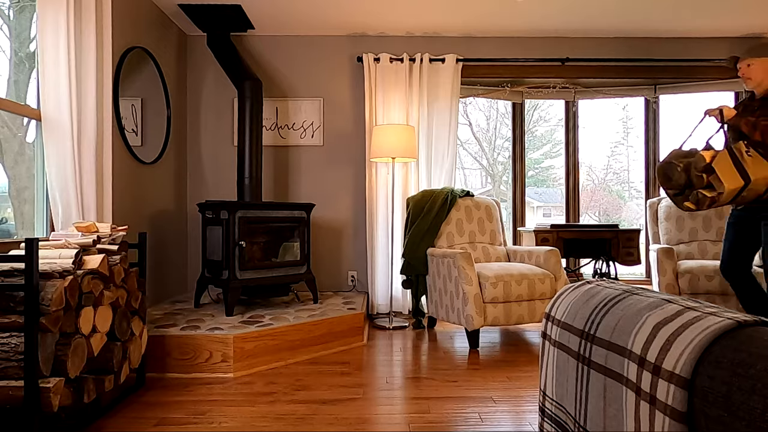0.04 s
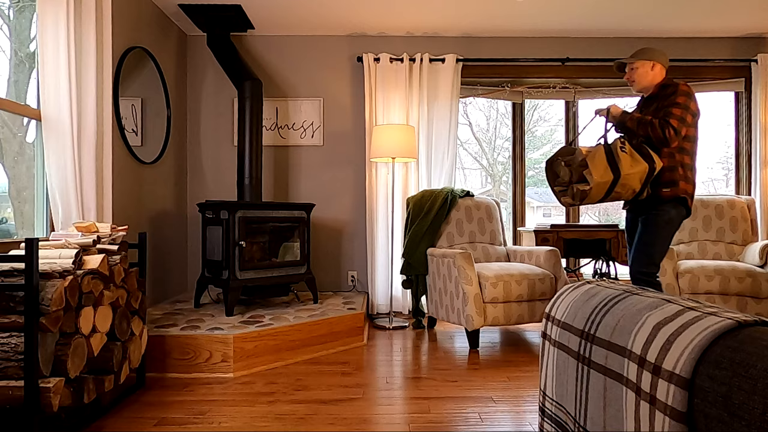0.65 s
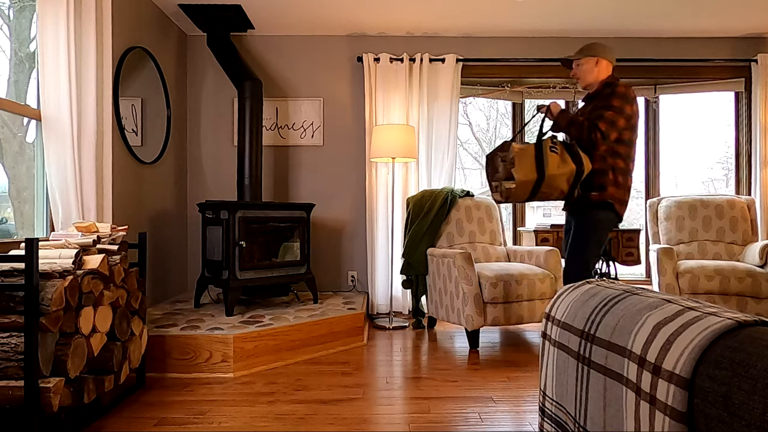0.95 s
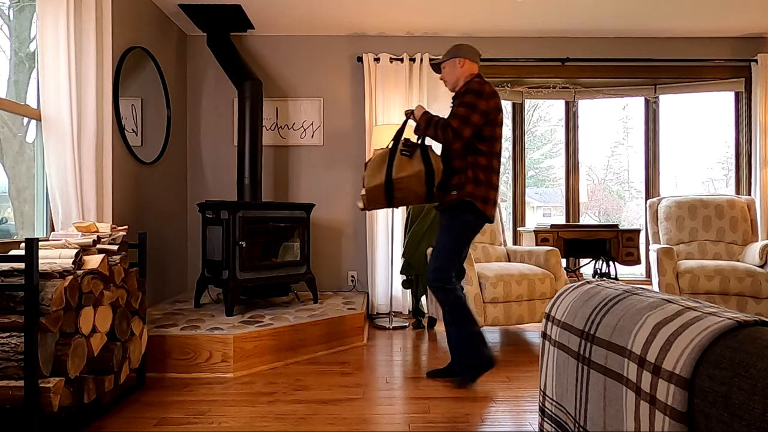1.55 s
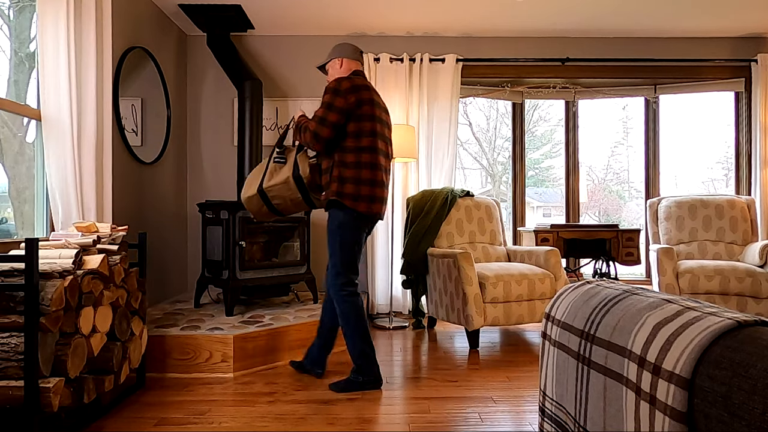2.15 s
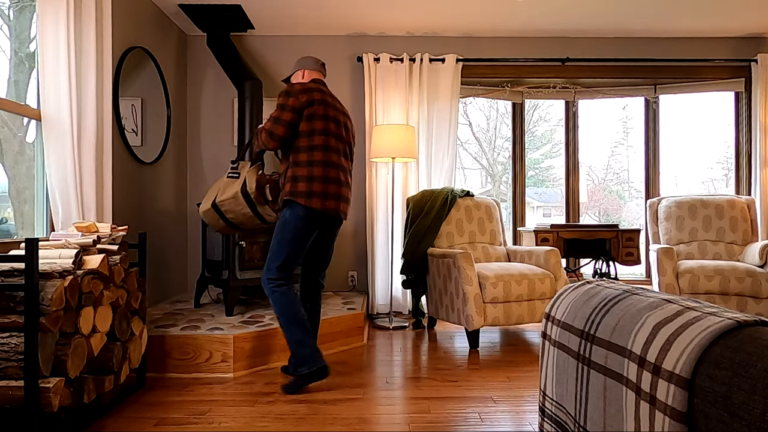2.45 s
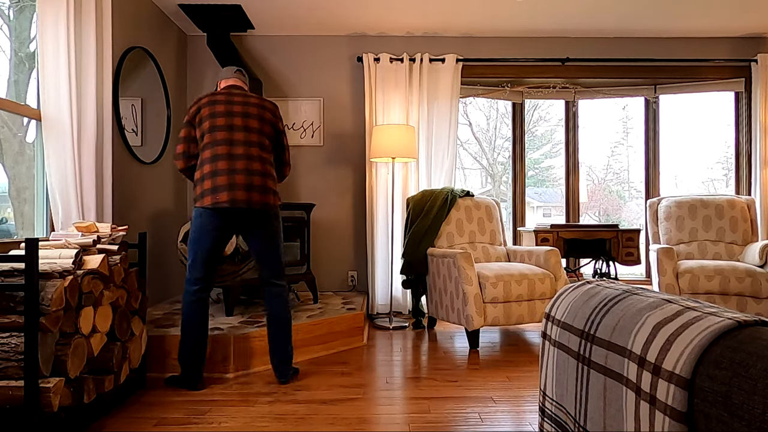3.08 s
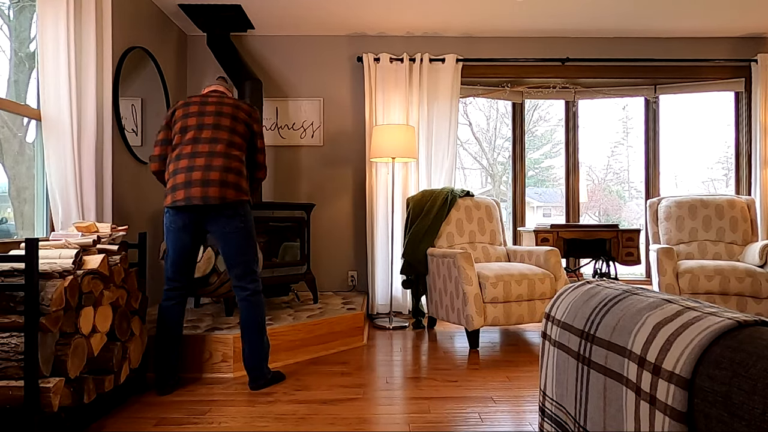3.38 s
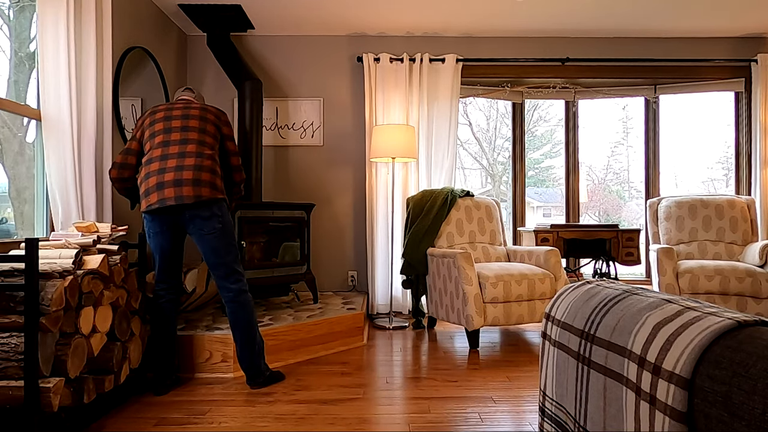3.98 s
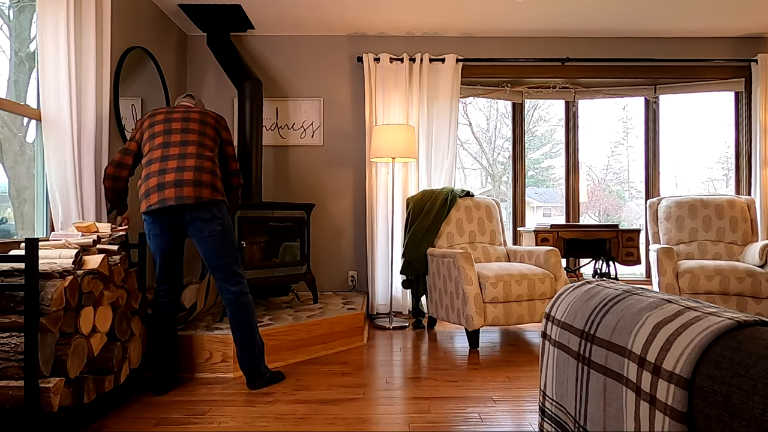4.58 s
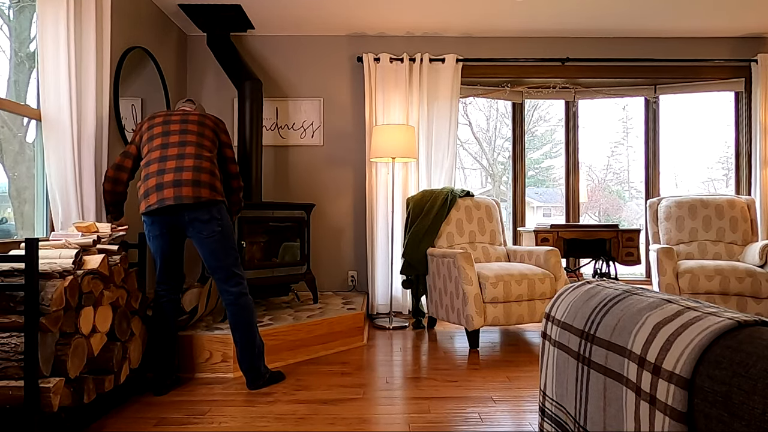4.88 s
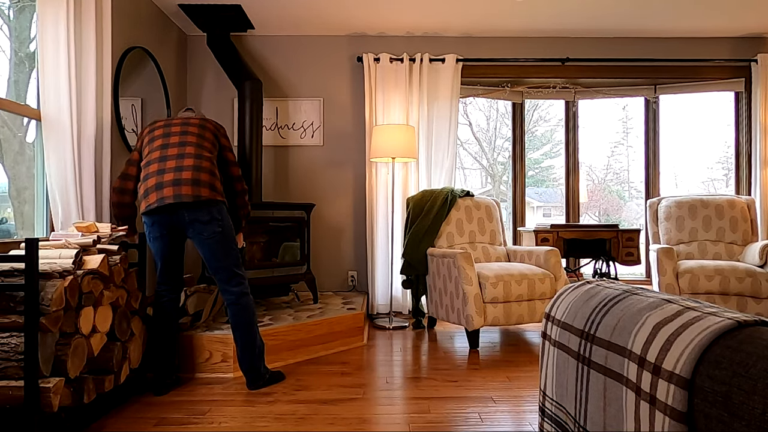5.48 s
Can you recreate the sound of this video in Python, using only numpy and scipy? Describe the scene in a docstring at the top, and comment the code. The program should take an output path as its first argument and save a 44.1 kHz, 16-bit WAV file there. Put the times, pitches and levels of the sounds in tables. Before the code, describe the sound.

Deep, dull footfalls cross the floorboards of a living room, slightly right of the microphone, with soft sock scuffs. The firewood being carried gives one quick, loud clatter. The steps lighten while canvas swishes and bark crackles, then the logs slide, knock and briefly squeak as they settle on a stone hearth, its hollow base thudding under them. A faint fan runs throughout.

```python
"""A living room with a wooden floor and a stone hearth. A man in socks carries a canvas bag of split
firewood across it and sets it down. His heels set the joists booming, and the load thuds on the hollow
platform under the stone. Logs knock, squeak and scrape, bark snaps, canvas rustles and socks scuff
the boards. A fan hums faintly behind it all."""
import sys
import numpy as np
from scipy import signal
from scipy.fft import rfft, irfft, next_fast_len
from scipy.io import wavfile
from scipy.ndimage import uniform_filter1d

SR = 44100
rng = np.random.default_rng(int(sys.argv[2]) if len(sys.argv) > 2 else 0)


def inscribe(sig):
    """Save sig as 16-bit PCM at rate SR to the path in sys.argv[1].

    A 1-D sig is mono; a 2-D sig holds one channel per row.
    Samples are clipped to [-1, 1] before scaling.
    """
    pcm = np.round(np.clip(np.atleast_2d(sig).T, -1, 1) * 32767)
    wavfile.write(sys.argv[1], SR, pcm.astype(np.int16))


N = 243873
TIME = np.arange(N) / SR

# footsteps: (time [s], heel level [dB], heel contact [s], bone tap level [dB], push-off level [dB])
FOOTSTEPS = [(-.017, -37.5, 0.027, -62, -35), (.509, -24.5, .022, -63, -37), (.965, -24, .03, -64, -25),
             (1.452, -24.5, 0.023, -45, -28), (1.897, -25, 0.02, -55, -27),
             (2.978, -32.5, 0.021, -54.5, -46), (3.279, -39.5, 0.06, -69, -44.5),
             (3.685, -50.5, 0.023, -61, -59), (4.996, -40.5, 0.033, -65, -45),
             (5.168, -33, 0.024, -60, -46), (5.442, -43.5, 0.019, -59.5, -56)]
# boom of joists and boards: (frequency [Hz], level [dB], t60 [s])
FLOOR_BOOM = [(22.68, -13, 0.89), (29.6, -12.5, 0.49), (44, 1, .33), (55.1, -1, 0.5), (88.8, -4, 0.45),
              (126.6, -9, 0.34), (150.7, -5.5, 0.24), (188.5, -9, 0.32), (261, -9.5, 0.18)]
# the load bumps down: (time [s], first end level [dB], other end level [dB], contact [s])
LANDINGS = [(4.331, -38.5, -36, 0.011), (4.425, -47, -52, 0.0027), (4.803, -37, -40.5, 0.012),
            (5.15, -39.5, -30.5, 0.0079), (5.246, -29, -33.5, .006), (5.308, -43.5, -52, 0.0026),
            (5.36, -31.5, -38, 0.0097)]
# boom of the hollow platform under the stone: (frequency [Hz], level [dB], t60 [s])
HEARTH_BOOM = [(28, -22, 0.75), (45.5, -5, 0.19), (68, -2.5, 0.25), (107, -1, 0.085), (136, -4, 0.096),
               (161.7, -2, 0.27), (228.7, 2, .16), (352, -5.5, 0.074)]
# log against log: (time [s], ring level [dB], hardness [dB])
LOG_HITS = [(2.013, -49.5, 3.5), (2.591, -30.5, 6), (2.604, -30.5, 3), (2.617, -30, 8.5),
            (2.621, -30.5, 8.5), (2.630, -31, -0.5), (3.008, -56, -10.5), (3.933, -54.5, 14),
            (4.318, -48, 3), (4.573, -53.5, 10.5), (4.746, -44.5, 4), (4.789, -44.5, -13.5),
            (4.817, -48, 0), (4.845, -46.5, -12.5), (5.18, -43, -1), (5.249, -33, 0), (5.292, -40.5, 0),
            (5.366, -43, 4.5), (5.373, -42.5, 5.5), (5.398, -54, -2)]
# ring heard on each knock, wood modes plus the microphone's resonance near 1.2-1.3 kHz:
# (frequency [Hz], level [dB], t60 [s])
KNOCK_RING = [(354, -6, 0.18), (443, 1.5, 0.099), (517, -5, 0.18), (620, -6.5, 0.075), (1195, 2.5, 0.31),
              (1211, -3.5, 0.2), (1233, -1.5, 0.24), (1288, 3.5, 0.12), (1308, 3, 0.2), (1382, -1, 0.16),
              (1574, 2, 0.085), (1635, -10, 0.066), (2190, 6.5, .07), (2440, -5, 0.06), (2725, -5, 0.12),
              (2950, 0, 0.11), (3280, -25, 0.11), (3280, -3.5, 0.071), (3550, -7, 0.14), (4620, -10, 0.094),
              (4770, -6, 0.06), (5050, -9, 0.044)]
# crunch of wood on wood: (frequency [Hz], level [dB])
CRUNCH_EQ = [(150, -16.5), (330, -16), (440, -11.5), (620, -9.5), (850, -29), (1050, -5), (1230, 4),
             (1430, -6.5), (1620, 0), (1920, -9.5), (3100, -4), (4000, -10.5), (5000, -12), (7000, -20),
             (11000, -36.5), (13500, -50), (15000, -59)]
# dry wood squeaks: (time [s], level [dB], pitch [Hz], length [s])
WOOD_SQUEAKS = [(2.01, -46.5, 3076, 0.0145), (2.014, -47, 1317, 0.043), (3.936, -54, 2760, 0.036),
                (5.098, -47, 2410, 0.026), (5.13, -46.5, 2944, 0.029), (5.24, -27.5, 1638, 0.021),
                (5.289, -40, 3700, 0.011)]
# bark and splinters snap, cloth crackles: (time [s], level [dB], centre [Hz])
BARK_SNAPS = [(.227, -51.5, 4030), (0.987, -56.5, 4370), (1.008, -59, 4770), (1.468, -52.5, 2400),
              (1.69, -54, 2600), (1.923, -55.5, 2470), (1.966, -50, 2780), (2.017, -51.5, 5850),
              (3.474, -42.5, 3100), (3.509, -48, 9000), (3.937, -46, 5100), (4.292, -43.5, 4650),
              (4.296, -37, 5070), (4.35, -52, 11000), (4.575, -52.5, 6530), (4.716, -46, 8000),
              (4.761, -43.5, 5500), (4.857, -43.5, 3580)]
# logs slide on the stone: (peak time [s], level [dB], swell [s])
LOG_SLIDES = [(4.375, -47, 0.086), (4.59, -63, 0.05), (4.752, -40.5, 0.055), (4.81, -41.5, 0.056),
              (4.94, -51.5, 0.63), (5.19, -44.5, .16), (5.25, -40.5, 0.055), (5.38, -37.5, 0.031)]
# wood dragged on stone: (frequency [Hz], level [dB])
SCRAPE_EQ = [(100, 3.5), (200, -3.5), (550, -1), (850, -6.5), (1250, 3.5), (1900, -6.5), (2500, -7),
             (4600, -23), (7000, -36), (11000, -34), (15000, -53)]
# bag and clothes swish: (peak time [s], level [dB], swell [s])
SWISHES = [(.05, -55.5, .2), (.14, -59, 0.34), (.64, -64.5, 0.19), (1.02, -63.5, 0.16), (1.47, -68.5, 0.22),
           (1.57, -62.5, 0.13), (1.71, -66.5, 0.097), (1.95, -66, 0.36), (2.57, -58.5, 0.21),
           (3.12, -61.5, 0.17), (3.37, -58.5, 0.4), (3.48, -52, 0.13), (3.6, -62.5, .05), (3.74, -63, .07),
           (3.85, -60.5, .14), (4.35, -47.5, 0.056), (4.775, -46.5, 0.096), (4.87, -67, .03),
           (5.12, -57, 0.17)]
# steady rub as the bag is swung round, lowered and opened: (time [s], level [dB])
BAG_RUB = [(1.3, -80.5), (1.8, -77.5), (2.3, -68.5), (2.9, -77), (3.55, -61.5), (3.7, -96), (4.25, -100),
           (4.65, -63), (4.95, -60.5), (5.53, -69)]
# rubbing cloth: (frequency [Hz], level [dB])
CANVAS_EQ = [(400, -10.5), (900, -10.5), (1300, -2), (1850, -4), (3200, -6.5), (4700, -7.5), (7700, -15.5),
             (12000, -31), (15000, -41)]
# socks scuff the boards: (peak time [s], level [dB], swell [s])
SOCK_SCUFFS = [(.06, -52.5, 0.072), (.16, -63, .05), (.65, -56.5, 0.055), (1.17, -60.5, 0.17),
               (1.48, -63, .02), (1.58, -63.5, 0.05), (2.2, -61.5, 0.17), (3.68, -65.5, 0.038)]
# sock on wood: (frequency [Hz], level [dB])
SOCK_EQ = [(100, -3), (250, 7.5), (600, -2.5), (900, -6), (1300, 0.5), (1800, -6.5), (2600, -16.5),
           (6000, -39), (15000, -60)]
# the fan's rush of air: (frequency [Hz], level [dB])
AIR_EQ = [(12, -26), (25, 8), (47, -2.5), (90, -13), (160, -4), (297, -2), (361, -7), (500, -12),
          (800, -23), (1200, -16), (1860, -28), (6170, -34), (7700, -33.5), (15400, -66.5)]
# the fan's motor tones: (frequency [Hz], level [dB])
MOTOR_HUM = [(226.1, -66), (296.1, -62), (355.3, -67), (452.2, -73), (592.2, -78)]
# decay of the room's tail: (frequency [Hz], t60 [s])
ROOM_DECAY = [(100, 0.71), (400, 0.75), (1200, 0.57), (3000, 0.47), (6000, 0.47), (13000, 0.26)]
# how alike diffuse sound is left and right: (frequency [Hz], correlation [0-1])
STEREO_LIKENESS = [(50, 0.8), (250, 0.68), (1200, 0.71), (2500, 0.58), (5000, 0.22), (12000, 0.15)]


def footsteps(bone_after_s=0.01185, ball_after_s=0.085, push_after_s=0.135):
    """Each foot rolls from heel to ball to toes and sets the floor booming."""
    blows = []
    for s, heel_db, contact_s, bone_db, push_db in FOOTSTEPS:
        blows += [(s, heel_db, contact_s),
                  (s + bone_after_s, bone_db, 0.0041),   # the heel pad flattens, the bone taps through
                  (s + ball_after_s, heel_db - 13.5, 0.019),
                  (s + push_after_s, push_db, 0.042)]
    return thumps(blows, FLOOR_BOOM, spread_db=3, roughness=0.51)


def hearth_thuds(other_end_after_s=0.028):
    """The load touches with one end, then drops onto the other; the hollow platform booms."""
    blows = []
    for s, first_db, other_db, contact_s in LANDINGS:
        blows += [(s, first_db, contact_s), (s + other_end_after_s, other_db, contact_s)]
    return thumps(blows, HEARTH_BOOM, spread_db=4.5, roughness=0.45)


def log_knocks(body_db=-7.5, crack_db=-7):
    """Rough faces crunch, waking wood modes and a microphone resonance; harder hits crack more."""
    out, tap = np.zeros(N), TIME[:SR // 4] == 0
    fade = np.minimum(1, np.linspace(4, 0, len(tap))) ** 2
    for s, db, hardness_db in LOG_HITS:
        contact = colour(crunch(t60=0.035), CRUNCH_EQ)
        hit = fade * (contact + amp(-2) * ringing(tap, KNOCK_RING, spread_db=4))
        body = band(hit, 823, "low", order=3)
        ring = band(hit, [1000, 2100], "band")
        crack = band(hit, 2410, "high", order=3)
        registers = np.array([body, ring, crack])
        attack_rms = np.std(registers[:, :SR // 70], axis=1)
        gains = amp([body_db - hardness_db, 0, crack_db + hardness_db]) / attack_rms
        add(out, amp(db) * (gains @ registers), s)
    return out


def wood_squeaks(waver=0.035):
    """Dry wood sticks and slips: short tones that swell and fade, their pitch unsteady."""
    out = np.zeros(N)
    for s, db, hz, length_s in WOOD_SQUEAKS:
        swell = signal.windows.hann(int(length_s * SR))
        wobble = np.interp(TIME[:len(swell)], np.linspace(0, length_s, 12), rng.standard_normal(12))
        pitch = hz * (1 + waver * wobble)
        add(out, amp(db) * swell * np.sin(2 * np.pi * np.cumsum(pitch) / SR), s)
    return out


def bark_snaps(width_ratio=1.43, edge_db=-19):
    """A splinter tears: a brief burst round its own pitch, with a thin bright edge."""
    out = np.zeros(N)
    for s, db, hz in BARK_SNAPS:
        burst = crunch(t60=0.019)
        snap = band(burst, [hz / width_ratio, hz * width_ratio], "band") + amp(edge_db) * burst
        add(out, amp(db) * snap / np.std(snap[:SR // 200]), s)
    return band(out, [900, 9500], "band")


def log_scrapes():
    """Wood drags over stone in grainy strokes."""
    grain = friction(SCRAPE_EQ, catches_per_s=600, grain_db=1.5, hiss_db=2, flutter_db=2)
    return strokes(LOG_SLIDES, fall_db_per_s=133) * grain


def canvas_rustle():
    """Cloth rubs on cloth: swishes ride on the steadier rub of the bag."""
    rub = amp(np.interp(TIME, *np.transpose(BAG_RUB)))
    envelope = np.hypot(strokes(SWISHES, fall_db_per_s=167), rub)
    return envelope * friction(CANVAS_EQ, catches_per_s=2000, grain_db=3.5, hiss_db=6.5, flutter_db=1)


def sock_scuffs():
    """Socks brush the boards in soft, dull strokes."""
    grain = friction(SOCK_EQ, catches_per_s=1500, grain_db=1.5, hiss_db=7, flutter_db=2)
    return strokes(SOCK_SCUFFS, fall_db_per_s=111) * grain


def room(x, direct_db=-5, early_db=-2, early_t60=0.094, tail_db=-5):
    """Direct sound, a cluster of reflections from floor, stove and corner, then the room's tail."""
    n = SR * 2 // 3
    t, hz = TIME[:n], np.fft.rfftfreq(n, 1 / SR)
    noise, centres = rfft(diffuse(n)), np.array(ROOM_DECAY)[:, 0]
    tail = np.zeros((2, n))
    for centre, t60 in ROOM_DECAY:
        crossover = at_hz(np.c_[centres, centres == centre], hz)
        tail += irfft(noise * crossover, n) * amp(-60 * t / t60)
    tail *= np.minimum(t / 0.01, 1)
    early = diffuse(n) * amp(-60 * t / early_t60)
    response = amp(early_db) * even(early, width_hz=36) + amp(tail_db) * even(tail, width_hz=102)
    response[:, 0] += amp(direct_db)
    return signal.fftconvolve(x, even(response, width_hz=154), axes=1)[:, :N]


def fan(air_db=-58.5, hum_db=-2, waver_db=1.5, wander_rad=0.54):
    """A soft rush of air with a few wavering motor tones."""
    hum = np.zeros(N)
    for hz, db in MOTOR_HUM:
        peak = np.sqrt(2) * amp(db + waver_db * drift(6))
        hum += peak * np.sin(2 * np.pi * hz * TIME + wander_rad * drift(8))
    return amp(air_db) * colour(diffuse(N), AIR_EQ) + amp(hum_db) * hum


def thumps(blows, modes, spread_db, roughness):
    """A soft weight presses unevenly on a sprung deck: shorter contact wakes more high modes."""
    out = np.zeros(N)
    for s, db, contact_s in blows:
        progress = TIME[:SR * 2 // 3] / contact_s
        push = progress ** 2 * np.exp(-np.minimum(6 * progress, 40))
        force = push / push.sum() * (1 + roughness * rng.standard_normal(len(push)))
        add(out, amp(db) * ringing(force, modes, spread_db), s)
    return out


def ringing(force, modes, spread_db):
    """Driven modes, their levels varied on every hit; neighbours swing in opposite directions."""
    return sum((-1) ** k * amp(db + spread_db * rng.standard_normal()) * resonate(force, hz, t60)
               for k, (hz, db, t60) in enumerate(modes))


def resonate(force, hz, t60):
    """One mode: a unit tap sets off a decaying sine."""
    radius, angle = amp(-60 / (t60 * SR)), 2 * np.pi * hz / SR
    return signal.lfilter([0, np.sin(angle)], [1, -2 * radius * np.cos(angle), radius ** 2], force + 1e-18)


def crunch(t60):
    """A rough contact: countless tiny breaks, dying quickly, with no pitch of their own."""
    t = TIME[:SR // 4]
    return even(rng.standard_normal(len(t)) * amp(-60 * t / t60), width_hz=200)


def friction(eq, catches_per_s, grain_db, hiss_db, flutter_db):
    """Fibres catch and let go with uneven force; a smooth hiss stands for the room's smear."""
    catches = (rng.random(N) < catches_per_s / SR) * rng.choice([-1, 1], N)
    force = amp(grain_db * np.minimum(rng.exponential(1, N), 4))
    texture = rms_one(catches * force) + amp(hiss_db) * diffuse(N)
    return colour(texture, eq) * amp(flutter_db * drift(45))


def strokes(rows, fall_db_per_s, swell_db=20):
    """Rubbing envelope: each stroke swells to its peak, then dies at a common rate; powers add."""
    power = sum(amp(db - np.maximum(swell_db * (s - TIME) / swell_s, fall_db_per_s * (TIME - s))) ** 2
                for s, db, swell_s in rows)
    return uniform_filter1d(np.sqrt(power), size=400)


def diffuse(n):
    """Stereo white noise from all sides: narrow in the bass, wide on top."""
    size = next_fast_len(n)
    mid, side = rfft(rng.standard_normal((2, size)))
    alike = np.clip(at_hz(STEREO_LIKENESS, np.fft.rfftfreq(size, 1 / SR)), 0, 1)
    spectrum = np.sqrt(1 + alike) * mid + np.sqrt(1 - alike) * side * [[1], [-1]]
    return rms_one(irfft(spectrum, size)[:, :n])


def even(x, width_hz):
    """Flatten a burst's spectrum, roughly keeping its shape in time; energy 1."""
    n = x.shape[-1]
    size = next_fast_len(2 * n)
    spectrum = rfft(x, size)
    power = uniform_filter1d(np.abs(spectrum) ** 2, max(3, int(width_hz * size / SR)))
    return irfft(spectrum / np.sqrt(power + 1e-18), size)[..., :n]


def colour(x, eq):
    """Shape a noise with an EQ curve; rms 1."""
    n = x.shape[-1]
    size = next_fast_len(n)
    gain = amp(at_hz(eq, np.fft.rfftfreq(size, 1 / SR)))
    return rms_one(irfft(rfft(x, size) * gain, size)[..., :n])


def drift(rate_hz):
    """Slow random modulation; rms 1."""
    knots = rng.standard_normal(int(rate_hz * N / SR) + 2)
    return rms_one(np.interp(TIME * rate_hz, np.arange(len(knots)), knots))


def band(x, hz, kind, order=2):
    """Causal Butterworth filter."""
    return signal.sosfilt(signal.butter(order, np.clip(hz, 10, .45 * SR), kind, fs=SR, output="sos"), x)


def at_hz(points, hz):
    """Read a curve on a log-frequency axis."""
    f, value = np.transpose(points)
    return np.interp(np.log(np.maximum(hz, 1)), np.log(f), value)


def add(out, sound, s):
    """Mix a sound in at a time."""
    start = round(s * SR)
    a, b = np.clip([start, start + sound.shape[-1]], 0, N)
    out[..., a:b] += sound[..., a - start:b - start]


def pan(db):
    """Stereo gains for a level difference; positive leans left."""
    return amp(np.array([[db], [-db]]) / 2)


def amp(db):
    """Decibels to gain."""
    return 10 ** (np.asarray(db) / 20)


def rms_one(x):
    """Scale to rms 1."""
    return x / np.sqrt(np.mean(x ** 2) + 1e-20)


def scene():
    """The mix: booming floor and hearth, wood with room reverb, rubbing textures, the fan behind."""
    floor = amp(11) * footsteps() * pan(db=-5.5)
    hearth = amp(3.5) * hearth_thuds() * pan(db=-3.5)
    wood = room((log_knocks() + wood_squeaks()) * pan(db=0.8) + bark_snaps() * pan(db=-1))
    canvas = amp(2.5) * canvas_rustle()
    socks = amp(2) * sock_scuffs() * pan(db=2.5)
    scrapes = amp(-1) * log_scrapes() * pan(db=1)
    return floor + hearth + wood + canvas + socks + scrapes + fan()


def record(dry):
    """The microphone drops the deepest rumble; the very top is cut steeply."""
    high_cut = signal.ellip(10, .1, 80, 14900, fs=SR, output="sos")
    return signal.sosfilt(high_cut, band(dry, 15, "high"))


dry = scene()
out = record(dry)
inscribe(out)
```